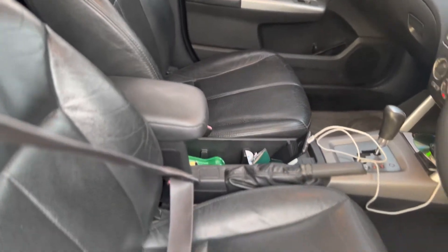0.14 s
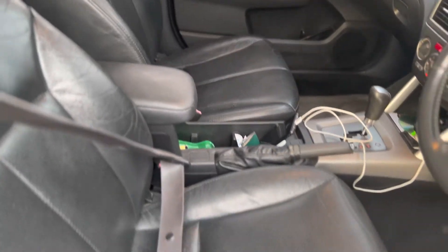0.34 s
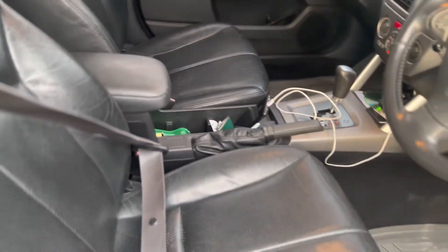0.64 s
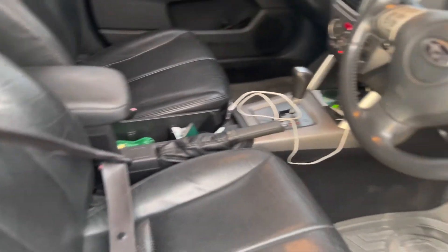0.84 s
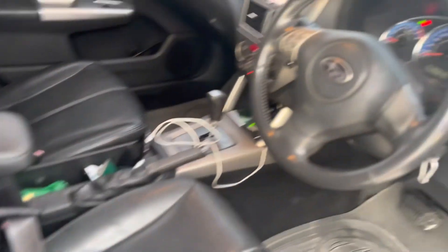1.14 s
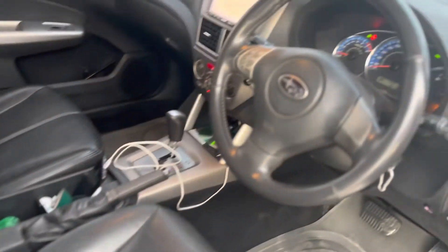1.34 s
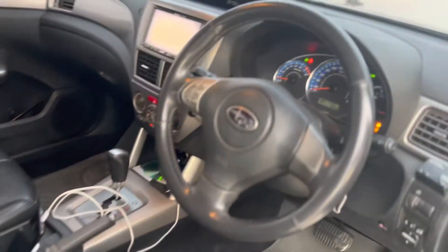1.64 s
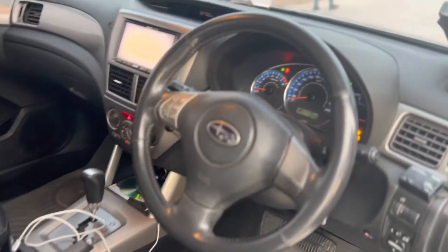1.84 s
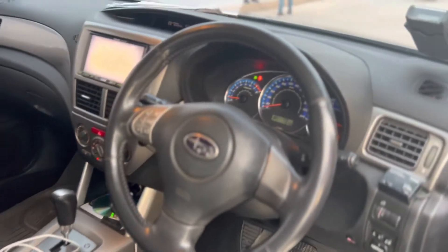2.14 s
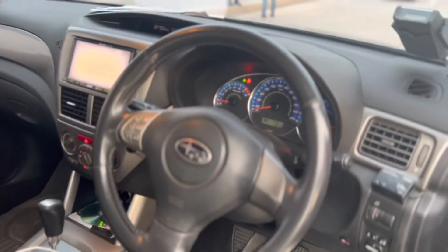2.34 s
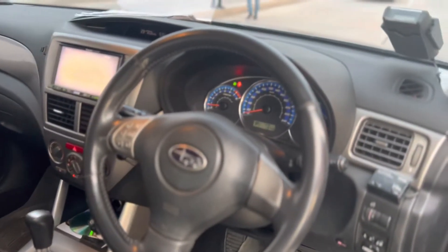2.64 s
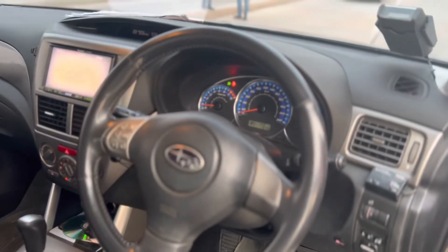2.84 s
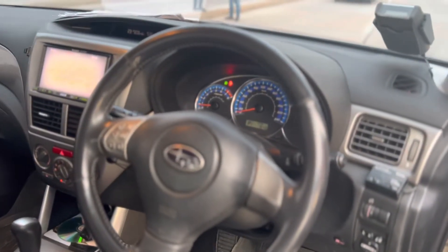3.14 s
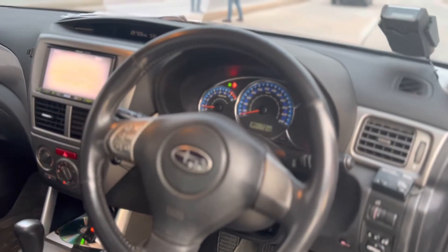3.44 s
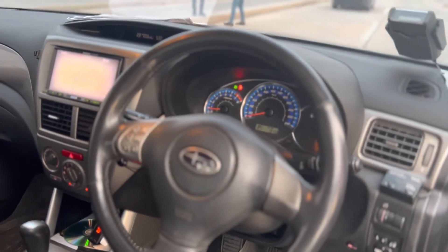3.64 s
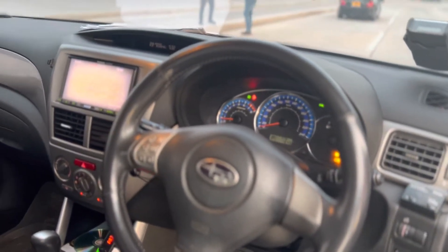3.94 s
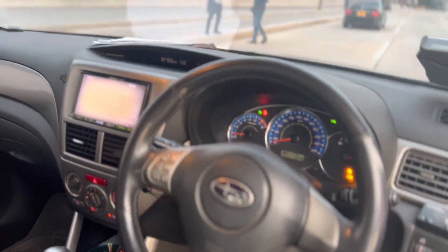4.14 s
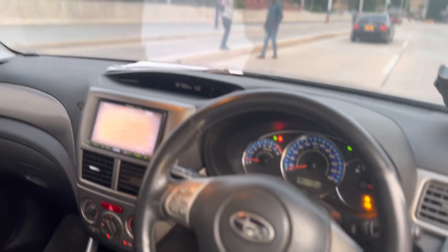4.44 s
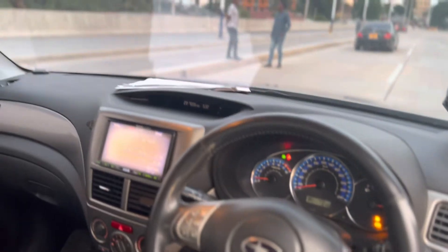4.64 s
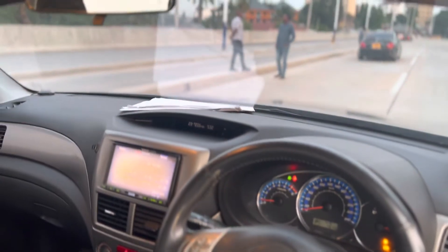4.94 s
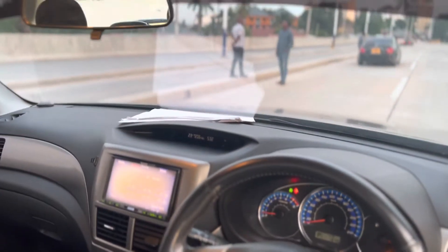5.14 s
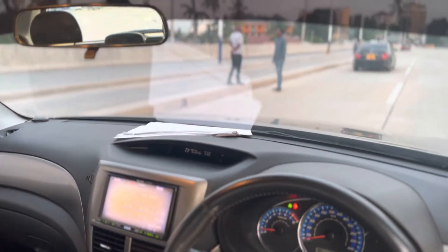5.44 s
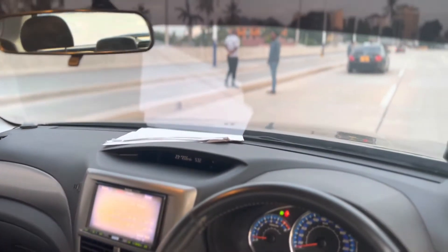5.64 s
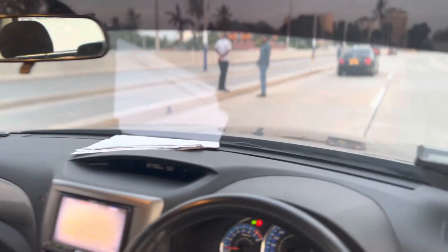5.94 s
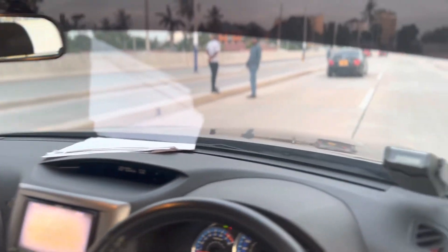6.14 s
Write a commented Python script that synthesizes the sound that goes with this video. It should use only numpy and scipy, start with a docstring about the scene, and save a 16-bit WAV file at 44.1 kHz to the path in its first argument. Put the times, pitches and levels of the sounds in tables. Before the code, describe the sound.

Inside a parked car, an uneven four-cylinder idle throbs low and steady, slowly sinking in speed. Dull, heavy handling bumps cluster in the first second or so over hand rumble, then stop. Fine valve ticking, wavering belt whine, fan hum and soft hiss continue, with tiny clicks near the middle. The engine swells slightly at the end. Close handheld stereo phone microphone.

```python
"""An uneven engine throb fills a parked car and slowly settles, with ticking, whine, hum and soft hiss.
The flat-four's firings drive low tones and pulsed noise; valve seatings ring short metal modes.
Belt whine and pulley hum are wavering tones tied to the firings; a fan hums under whistle and hissing air.
A hand-held phone is swung round: pushed resonances make dull early bumps, low noise is the hand's rumble.
Noise cracks make small clicks and a few dark ticks of engine clatter; two faint tones sound at the end."""
import sys
import numpy as np
from scipy import signal
from scipy.fft import rfft, irfft, next_fast_len
from scipy.io import wavfile
from scipy.ndimage import uniform_filter1d, map_coordinates

SR = 44100
rng = np.random.default_rng(int(sys.argv[2]) if len(sys.argv) > 2 else 0)


def master_out(mix):
    """Clip the mix to full scale and print it as 16-bit PCM to the path in sys.argv[1]."""
    frames = np.transpose(np.atleast_2d(mix))
    ceiling = np.clip(frames, -1, 1)
    pcm = np.round(ceiling * 32767).astype(np.int16)
    wavfile.write(sys.argv[1], SR, pcm)


N = 277389

# The idle sinks as the engine settles, and twice sags and recovers.
# Each row: time in seconds, speed in firings per second.
ENGINE_SPEED = [(0, 27.75), (.28, 27.3), (.5, 26.7), (.8, 26.65), (1.2, 26.95), (1.55, 26.75), (2, 26.6),
                (2.6, 26.25), (2.95, 25.95), (3.17, 25.5), (3.45, 25.92), (3.7, 25.88), (4.4, 25.5),
                (4.75, 25.25), (5.5, 24.98), (6.29, 24.9)]
# The settled idle in firings per second, at which the levels and pitches below hold.
IDLE_HZ = 25
# Strength of each cylinder in firing order, in dB; each layer scales it to its own unevenness.
CYLINDER_STRENGTH = [0.75, 0.037, -0.61, 0.57]
# Orders of the engine's drone. Each row: multiple of the firing rate, level in dB within the drone.
ENGINE_ORDERS = [(1.75, -9), (2, -6.5), (2.25, -10), (3.75, -12), (4, -2.5), (4.25, -12), (4.75, -12),
                 (6, -14.5), (7.25, -15), (8.65, -20), (10, -20), (11.5, -19), (13.3, -20)]
# Low boom of the engine in the cabin. Each row: frequency in Hz, relative density in dB per Hz.
BOOM_SPECTRUM = [(20, -24), (36, -7), (50, -6), (66, -7), (82, 2), (105, 4.5), (135, -2.5), (180, -2.5),
                 (215, -9.5), (280, -7.5), (330, -12), (400, -14.5), (600, -24), (1200, -49)]
# Engine-bay noise. Each row: frequency in Hz, relative density in dB per Hz.
BAY_SPECTRUM = [(150, -8), (300, 2), (480, 1.5), (720, 2.5), (950, 0.5), (1130, 2), (1350, -3),
                (2100, -3.5), (3000, -10.5), (4200, -14.5), (7000, -25), (15000, -41)]
# Layer levels at the settled idle in dB, before swells, flutter and stereo placing.
NOTE_DB, BOOM_DB, ORDERS_DB, BAY_DB, HISS_DB = -41.5, -42.5, -44.5, -51.5, -63
# A faster engine is louder, in dB per extra firing a second.
BOOM_DB_PER_HZ, BAY_DB_PER_HZ, HISS_DB_PER_HZ = 1.5, 2, 0.85
# The engine grows louder towards the end.
# One row: centre in seconds, half-width in seconds, boom and drone lift in dB, bay noise lift in dB.
ENGINE_END_SWELL = (6.52, 0.75, 2.4, 3)

# Valve clatter. Each row: frequency in Hz, relative density in dB per Hz.
CLATTER_SPECTRUM = [(500, -22), (1200, 12), (2200, 3), (3200, -8), (6000, -18), (9000, -33), (15500, -11)]
# Valve ticks: level in dB before the swell, how much softer every second valve is in dB, ring t60 in seconds.
TAPPET_DB, WEAK_VALVE_DB, TAPPET_T60_S = -65.3, 3, .04

# The whine's two main strands, as multiples of the firing rate.
LOWER_STRAND, UPPER_STRAND = 42.85, 43.85
# Weaker whine strands. Each row: multiple of the firing rate, level in dB against the upper strand.
WEAK_STRANDS = [(41, -9), (41.8, -6), (44.9, -12), (48, -10), (73.5, -9), (85.7, -9)]
# The two strands trade strength as the whine swells and fades, before the panel lifts them.
# Each row: time in seconds, lower strand in dB, upper strand in dB.
STRAND_LEVELS = [(0, -60, -82), (.55, -66, -67.5), (.95, -72, -60), (1.15, -62, -61), (1.85, -60, -61),
                 (2.3, -65, -60.5), (2.8, -70, -64.5), (3.1, -58, -65), (3.55, -70, -64),
                 (3.95, -63, -67.5), (4.7, -63, -73), (5.8, -62, -70), (6.29, -71, -79)]
# A pulley hums, clearest in front of the dashboard. Each row: time in seconds, hum level in dB.
PULLEY_HUM_LEVEL = [(1, -73), (2.1, -64.5), (3.1, -62), (4.5, -61.5), (6, -62), (6.29, -67)]
# Panels that radiate the drone and the whine. Each row: centre in Hz, width in Hz, lift in dB.
PANEL_MODES = [(263, 9, 8), (1145, 24, 8)]

# Dull bumps. Each row: start in seconds, peak in dB before stereo lean, pitch in Hz, sharpness as Q.
BUMP_HITS = [(0.363, -24.5, 124, 1.6), (0.387, -25.5, 70, 1.8), (0.5325, -13, 94, 1), (0.58, -14, 80, 2.8),
             (0.617, -26, 61.6, 4.5), (0.666, -10, 132, 2.4), (0.689, -19, 56, 2.7), (.711, -23, 165, 2),
             (.733, -20.5, 66, 1.5), (.763, -27, 71, 2), (0.851, -21.5, 100, 0.82), (.891, -21, 216, 2.7),
             (0.9, -17.5, 82.6, 0.9), (0.922, -33, 58, 1.8), (1.023, -24.5, 108, 5.7),
             (1.091, -24, 74, 2.2), (1.147, -25.5, 106, 2.2), (1.222, -24.5, 91, 2), (1.245, -30, 92, 2.8)]
# A bump reaches the right microphone later than the left, in seconds.
BUMP_LAG_S = .00055
# Small clicks and rubs, with a few dark ticks of the engine's clatter.
# Each row: start in seconds, relative level in dB, rise in seconds,
# t60 in seconds, brightness in dB per octave, pitch of the part that rings in Hz.
CLICK_HITS = [(.338, -33, .003, 0.058, -2, 4600), (.353, -42, .003, .06, -4, 3000),
              (.366, -38, .001, 0.039, -7, 2100), (.688, -36, 0.0023, .02, -10, 2000),
              (0.694, -37, 0.00077, 0.023, -5, 4200), (2.968, -49.5, .001, 0.029, -16, 2300),
              (3.282, -46, .001, 0.033, -14, 2300), (3.4878, -35, .0002, 0.011, 8, 5000),
              (3.4893, -28, .001, .024, 0.5, 3280), (3.5028, -35.5, .0005, .026, -2, 3400),
              (3.521, -28, 0.00033, 0.018, 1.5, 4000), (3.748, -52, .001, .025, -8, 2300)]
# Colour of the clicks and ticks before their own brightness. Each row: frequency in Hz, gain in dB.
CLICK_COLOUR = [(600, -42), (1500, -5), (2300, 3.5), (3400, 7.5), (4800, 3.5), (7000, 0.5), (9000, -5.5),
                (15500, -17)]
# Plastic trim resonances in the clicks and ticks. Each row: centre in Hz, width in Hz, lift in dB.
TRIM_MODES = [(1650, 200, 3), (2300, 300, 6), (3850, 600, -3), (4700, 300, 4), (5500, 500, 5)]
# Ring of the part that sounds: width in Hz, lift in dB.
PART_WIDTH_HZ, PART_DB = 900, 6
# Rumble of the hand. Each row: frequency in Hz, relative density in dB per Hz.
GRIP_SPECTRUM = [(20, -48), (45, -4.5), (75, 1.5), (120, 1), (190, -10), (260, -17), (420, -23),
                 (1000, -29), (2500, -50)]
# The hand rumbles while the phone swings. Each row: time in seconds, rumble level in dB.
HAND_LEVEL = [(0, -37), (.2, -30), (.39, -29.5), (.48, -34), (.8, -34), (1.2, -35.5), (1.5, -47),
              (2.2, -70)]

# Fan pitch in Hz at the settled idle, and its rise in Hz per extra firing a second.
FAN_HZ, FAN_HZ_PER_HZ = 71.8, 1
# The fan grows as the phone turns from the seats to the dashboard. Each row: time in seconds, hum in dB.
FAN_HUM_LEVEL = [(1.2, -44.5), (2, -40), (3.1, -38), (4.5, -38), (6.29, -40.5)]
# Whistle pitch in Hz at the settled idle, and its rise in Hz per extra firing a second.
WHISTLE_HZ, WHISTLE_HZ_PER_HZ = 5700, 115
# The thin whistle comes twice. Each row: centre in seconds, half-width in seconds, level in dB.
WHISTLE_SWELLS = [(1.15, .4, -70), (5.85, 0.41, -75)]
# Rushing air. Each row: frequency in Hz, relative density in dB per Hz.
AIR_SPECTRUM = [(1000, 2), (3000, -10), (4800, 0.5), (6200, 6), (7200, -0.5), (8700, 9.5), (10200, -8),
                (12000, 1.5), (13800, -19), (15500, -7)]
# The hiss is briefly louder as the phone passes the dashboard.
# One row: centre in seconds, half-width in seconds, lift in dB.
HISS_NEAR_SWELL = (3.3, .65, 1.5)
# Faint brief tones. Each row: frequency at the centre in Hz, glide in Hz per second,
# centre in seconds, half-width in seconds, level in dB.
BRIEF_TONES = [(550, 0, 6.245, .05, -53), (980, -220, 6.13, .11, -59.5)]

# Cabin resonances and hollows. Each row: centre in Hz, width in Hz, lift in dB.
CABIN_MODES = [(59.2, 20.3, 9), (257, 13, 1.5), (299.7, 14, 5), (554, 9.3, -2.5), (690, 18, -9),
               (664, 18, -0.5), (807, 13, 2), (862, 90, -4), (899, 24, 7.5), (949, 36, 3), (1010, 35, 0),
               (1350, 55, -0.5), (3020, 15, 4), (4030, 210, -1), (4700, 58, 2.5)]
# Stereo likeness of the noises. Each row: frequency in Hz, left-right likeness before the lean and lead.
STEREO_LIKENESS = [(25, .65), (60, .7), (110, .8), (200, .8), (380, .75), (700, .25), (1290, .38),
                   (2400, .15), (6500, .08), (8300, .65), (11500, .9), (15000, .9)]
# Stereo balance. Each row: frequency in Hz, left minus right in dB.
STEREO_LEAN = [(70, 1), (180, 0), (300, 0), (600, -6), (850, -3), (1130, -5), (1500, -1), (2200, -3),
               (3500, -0.5), (5500, 9), (7200, 0.5), (9000, -1), (14000, 0.5)]
# Stereo phase. Each row: frequency in Hz, lead of the left in radians.
STEREO_LEAD = [(150, 0), (300, -.25), (520, -.9), (850, -.8), (1150, -.25), (1450, -1.7), (2000, -.8),
               (3000, -1), (4600, 0), (6200, 1), (7000, 2.3), (8400, 0), (10200, -3.1), (12000, -6.3),
               (13800, -9.4), (15500, -12.6)]
# Upper band limit of the phone in Hz.
TOP_HZ = 15800


def amp(db):
    """Decibels to gain."""
    return 10 ** (np.asarray(db) / 20)


def unit(x):
    """x at rms 1."""
    return x / np.sqrt(np.mean(x ** 2) + 1e-20)


def seconds():
    """The time of each sample."""
    return np.arange(N) / SR


def swell(centre_s, width_s):
    """A bell-shaped envelope, 1 at its centre."""
    return np.exp(-((seconds() - centre_s) / width_s) ** 2)


def along(points, hz):
    """(Hz, value) points read on a log frequency axis."""
    f, value = np.transpose(points)
    return np.interp(np.log(hz + 1), np.log(f + 1), value)


def curves(rows):
    """One value per sample for each column after the time."""
    times, *columns = np.transpose(rows)
    return [np.interp(seconds(), times, column) for column in columns]


def wobble(rate):
    """A smooth random curve, rate knots a second."""
    knots = rng.standard_normal(int(N * rate / SR) + 4)
    return map_coordinates(knots, [np.arange(N) * rate / SR])


def filtered(x, response):
    """x shaped by a complex response of frequency."""
    size = x.shape[-1]
    padded = next_fast_len(size + SR // 2)
    hz = np.fft.rfftfreq(padded, 1 / SR)
    return irfft(rfft(x, padded) * response(hz), padded)[..., :size]


def lifts(modes, hz):
    """Gain of narrow resonant peaks and hollows."""
    return amp(sum(db / (1 + (2 * (hz - centre) / width) ** 2) for centre, width, db in modes))


def ports(hz):
    """Level and phase at the left and right microphone, split evenly between them."""
    half = amp(along(STEREO_LEAN, hz) / 2) * np.exp(1j * along(STEREO_LEAD, hz) / 2)
    return np.array([half, 1 / half])


def placed(x):
    """A sound as both microphones hear it."""
    return filtered(x, ports)


def rush(spectrum, drive):
    """Stereo noise of rms 1, pulsed by drive and then coloured by the cabin."""
    def mid_side(hz):
        turn = np.arccos(np.clip(along(STEREO_LIKENESS, hz), -1, 1)) / 2
        colour = amp(along(spectrum, hz)) * lifts(CABIN_MODES, hz)
        return colour * np.array([np.cos(turn), np.sin(turn)])

    noise = drive * rng.standard_normal((2, N))
    mid, side = filtered(noise, mid_side)
    return unit(placed(np.array([mid + side, mid - side])))


def strokes(firing, fall_db, uneven):
    """Combustion envelope: jumps at each firing, sinks until the next; cylinders and firings differ."""
    index = firing.astype(int)
    cylinder_db = np.take(CYLINDER_STRENGTH, index, mode="wrap")
    size_db = cylinder_db + rng.standard_normal(index[-1] + 1)[index]
    return unit(amp(uneven * size_db - fall_db * (firing % 1)))


def tone(cycles, drift, drift_rate, flutter_db, flutter_rate):
    """A sine line of rms 1 that wanders in phase and strength."""
    line = np.sin(2 * np.pi * cycles + drift * wobble(drift_rate))
    return unit(line * amp(flutter_db * wobble(flutter_rate)))


def patchy(x, depth_db=1.95):
    """x with patches of random gain, about 250 Hz wide and 70 ms long; rms 1."""
    z = signal.stft(x, nperseg=1024)[2]
    field = rng.standard_normal(z.shape[1:])
    for axis in (0, 1):
        field = uniform_filter1d(field, size=6, axis=axis)
    return unit(signal.istft(z * amp(depth_db * unit(field)), nperseg=1024)[1][:, :N])


def engine(firing, excess):
    """Firings shake the body in tones and pulse the noise; all but the note ease off with the speed."""
    swell_s, width_s, boom_lift_db, bay_lift_db = ENGINE_END_SWELL
    late = swell(swell_s, width_s)
    boom_gain = amp(BOOM_DB_PER_HZ * excess + boom_lift_db * late)
    bay_db = BAY_DB + BAY_DB_PER_HZ * excess + bay_lift_db * late + 0.5 * wobble(9.8)
    note = amp(NOTE_DB) * tone(firing, drift=0.042, drift_rate=5, flutter_db=3.5, flutter_rate=9.2)
    orders = sum(
        amp(db) * tone(multiple * firing, drift=.3, drift_rate=4, flutter_db=1.6, flutter_rate=5)
        for multiple, db in ENGINE_ORDERS)
    drone = filtered(amp(ORDERS_DB) * orders, lambda hz: lifts(PANEL_MODES, hz))
    boom = amp(BOOM_DB) * rush(BOOM_SPECTRUM, strokes(firing, fall_db=1.5, uneven=0.64))
    bay = amp(bay_db) * patchy(rush(BAY_SPECTRUM, strokes(firing, fall_db=0.5, uneven=0.69)))
    return placed(note) + boom_gain * (placed(drone) + boom) + bay


def valves(firing, rattle_db=-65, near_s=2.86, near_width_s=0.69, near_db=5.5):
    """Valves seat twice per firing with tick and uneven rattle, louder as the phone faces the dashboard."""
    index = (2 * firing).astype(int)
    cylinder_db = np.take(CYLINDER_STRENGTH, index // 2, mode="wrap")
    size_db = 2 * cylinder_db + 2 * rng.standard_normal(index[-1] + 1)[index]
    fall_db = 10 * (2 * firing % 1)
    rattle = rush(CLATTER_SPECTRUM, unit(amp(size_db + wobble(11) - fall_db)))
    near_gain = amp(near_db * swell(near_s, near_width_s))
    return near_gain * (amp(rattle_db) * rattle + amp(TAPPET_DB) * tappets(firing))


def tappets(firing, ring_hz=2100, spread=0.1985, scatter_db=3, late_s=0.001506):
    """Every valve that seats rings a few short metal modes, a little different each time; rms 1."""
    seats = np.flatnonzero(np.diff((2 * firing).astype(int)))
    t, out = np.arange(SR // 25) / SR, np.zeros((2, N + SR))
    chances = rng.standard_normal((len(seats), 4, 6))
    for number, (start, chance) in enumerate(zip(seats, chances)):
        pitch, left, right, (size, delay, *_) = chance
        mode_hz = ring_hz * np.exp(spread * pitch)[:, None]
        modes = np.sin(2 * np.pi * mode_hz * t) * amp(-60 * t / TAPPET_T60_S)
        cylinder_db = CYLINDER_STRENGTH[number // 2 % len(CYLINDER_STRENGTH)]
        size_db = cylinder_db + scatter_db * np.tanh(size) - WEAK_VALVE_DB * (number % 2)
        first = start + round(abs(delay) * late_s * SR)
        out[:, first:first + len(t)] += amp(size_db) * (np.array([left, right]) + 1) @ modes
    return unit(placed(out[:, :N]))


def belt(firing):
    """Belt-driven parts whine in wavering strands tied to engine speed, lifted at the panel's resonances."""
    def strand(multiple):
        return tone(multiple * firing, drift=.35, drift_rate=24, flutter_db=2.0, flutter_rate=20)

    lower_db, upper_db = curves(STRAND_LEVELS)
    pulley_db, = curves(PULLEY_HUM_LEVEL)
    upper = strand(UPPER_STRAND) + sum(amp(db) * strand(multiple) for multiple, db in WEAK_STRANDS)
    strands = amp(lower_db) * strand(LOWER_STRAND) + amp(upper_db) * upper
    whine = filtered(strands, lambda hz: lifts(PANEL_MODES, hz))
    hum = tone(23.95 * firing, drift=.45, drift_rate=22, flutter_db=2.6, flutter_rate=12)
    return placed(whine + amp(pulley_db) * hum)


def bumps(sub_hz=54, soft_hz=235, lean_db=.7):
    """Each soft knock pushes a damped resonance; the left microphone is reached first and louder."""
    def soft(f):
        first = 1 - (f / soft_hz) ** 2 + .8j * f / soft_hz
        second = 1 - (f / soft_hz / 1.8) ** 2 + 1.2j * f / soft_hz
        return 1 / first / second

    def low_cut(f):
        return (1j * f / sub_hz) ** 2 / (1 - (f / sub_hz) ** 2 + .95j * f / sub_hz)

    out, push = np.zeros(N + SR), signal.unit_impulse(SR // 4)
    for s, db, hz, sharpness in BUMP_HITS:
        body = lambda f: 1 / (1 - (f / hz) ** 2 + 1j * f / hz / sharpness)
        knock = filtered(push, lambda f: body(f) * soft(f) * low_cut(f) ** 2)
        out[round(s * SR):][:len(push)] += amp(db) * knock / np.abs(knock).max()
    sides = np.array([[.5], [-.5]])  # left, right
    return filtered(out[:N], lambda f: amp(sides * lean_db) * np.exp(2j * np.pi * f * sides * BUMP_LAG_S))


def clicks(cabin_db=-12, cabin_t60_s=.18):
    """Short noise cracks, from small contacts or engine clatter, ring resonances; the cabin answers duller."""
    out, t = np.zeros((2, N + SR)), np.arange(SR // 5) / SR
    for s, db, rise_s, t60_s, bright_db, part_hz in CLICK_HITS:
        def ringing(hz):
            tilt_db = bright_db * np.log2((hz + 100) / 4000)
            modes = TRIM_MODES + [(part_hz, PART_WIDTH_HZ, PART_DB)]
            return amp(along(CLICK_COLOUR, hz) + tilt_db) * lifts(modes, hz)

        crack = rng.standard_normal(len(t)) * amp(-60 * t / t60_s) * (1 - np.exp(-t / rise_s))
        answer = rng.standard_normal((2, len(t))) * amp(cabin_db - 60 * t / cabin_t60_s)
        answer = filtered(answer, lambda hz: 1 / np.hypot(1, hz / 5000))
        # all of them sit 9 dB below their relative levels
        out[:, round(s * SR):][:, :len(t)] += amp(db - 9) * filtered(crack + answer, ringing)
    return out[:, :N]


def handling():
    """The hand shifts on the phone in fluctuating low noise while it is swung round, then comes to rest."""
    grip_db, = curves(HAND_LEVEL)
    return amp(grip_db) * rush(GRIP_SPECTRUM, amp(0.63 * wobble(26.5)))


def air(firing, excess):
    """Fan hum and thin whistle follow the engine speed in pitch; a noise hiss pulses with the firings."""
    fan_db, = curves(FAN_HUM_LEVEL)
    fan_cycles = np.cumsum(FAN_HZ + FAN_HZ_PER_HZ * excess) / SR
    fan = amp(fan_db) * tone(fan_cycles, drift=0.11, drift_rate=8.4, flutter_db=1.6, flutter_rate=11.0)
    blowing = sum(amp(db) * swell(s, width_s) for s, width_s, db in WHISTLE_SWELLS)
    whistle_cycles = np.cumsum(WHISTLE_HZ + WHISTLE_HZ_PER_HZ * excess) / SR
    whistle = blowing * tone(whistle_cycles, drift=1.6, drift_rate=150, flutter_db=3.5, flutter_rate=40)
    near_s, near_width_s, near_db = HISS_NEAR_SWELL
    near_lift_db = near_db * swell(near_s, near_width_s)
    hiss_db = HISS_DB + HISS_DB_PER_HZ * excess + near_lift_db + 0.5 * wobble(10)
    hiss = amp(hiss_db) * rush(AIR_SPECTRUM, strokes(firing, fall_db=4.5, uneven=1.0))
    return placed(fan + whistle) + hiss


def brief_tones():
    """Two faint, rough tones swell briefly at the end; the higher one slides down."""
    mix = np.zeros(N)
    for hz, glide, s, width_s, db in BRIEF_TONES:
        cycles = np.cumsum(hz + glide * (seconds() - s)) / SR
        line = tone(cycles, drift=.6, drift_rate=35, flutter_db=1.5, flutter_rate=20)
        mix += amp(db) * swell(s, width_s) * line
    return placed(mix)


def scene():
    """Engine, valves, belt and air follow the firings; handling, bumps, clicks and brief tones join them."""
    speed, = curves(ENGINE_SPEED)
    firing = np.cumsum(speed) / SR  # running count of firings
    excess = speed - IDLE_HZ
    machinery = engine(firing, excess) + valves(firing) + belt(firing) + air(firing, excess)
    return machinery + handling() + bumps() + clicks() + brief_tones()


def record(dry):
    """The phone keeps nothing above its band limit."""
    return filtered(dry, lambda hz: hz < TOP_HZ)


dry = scene()
out = record(dry)
master_out(out)
```